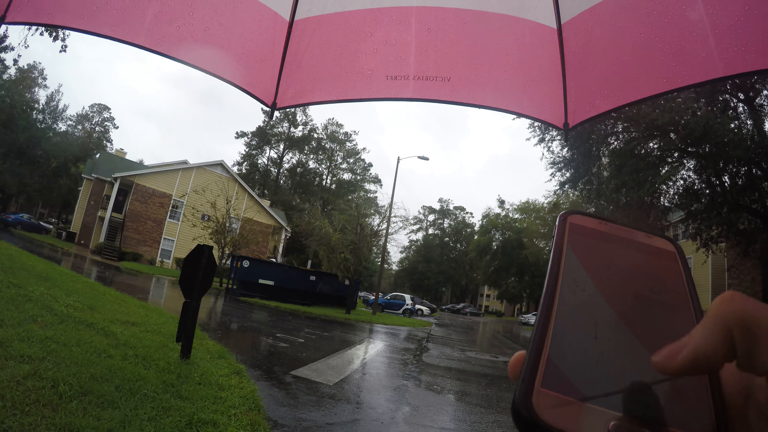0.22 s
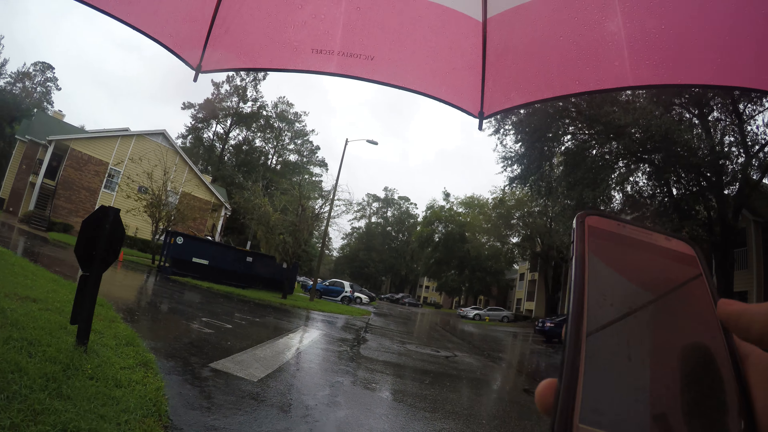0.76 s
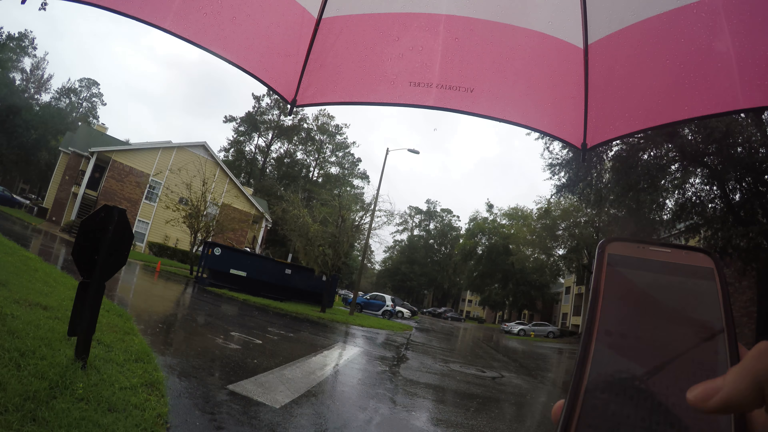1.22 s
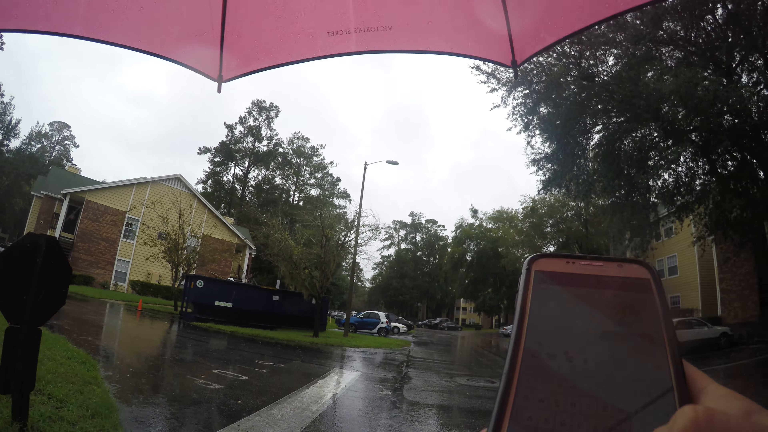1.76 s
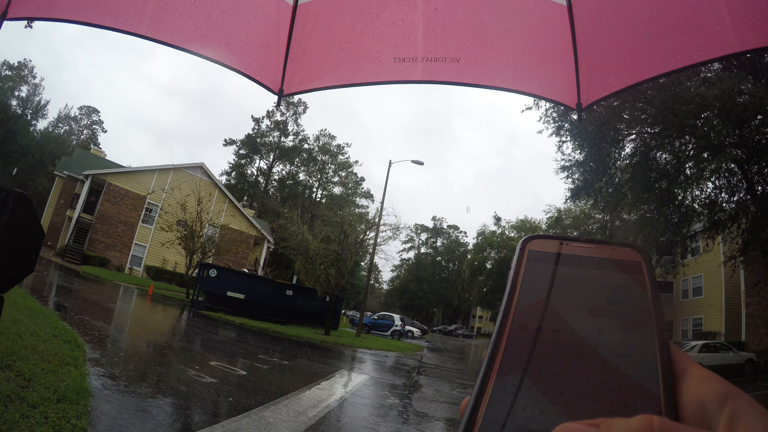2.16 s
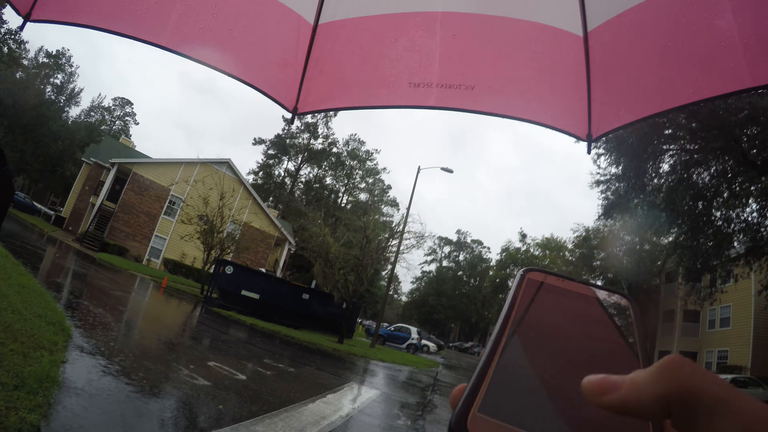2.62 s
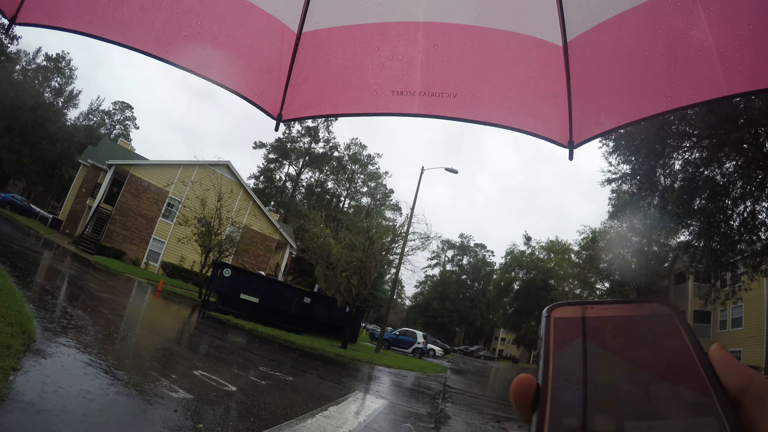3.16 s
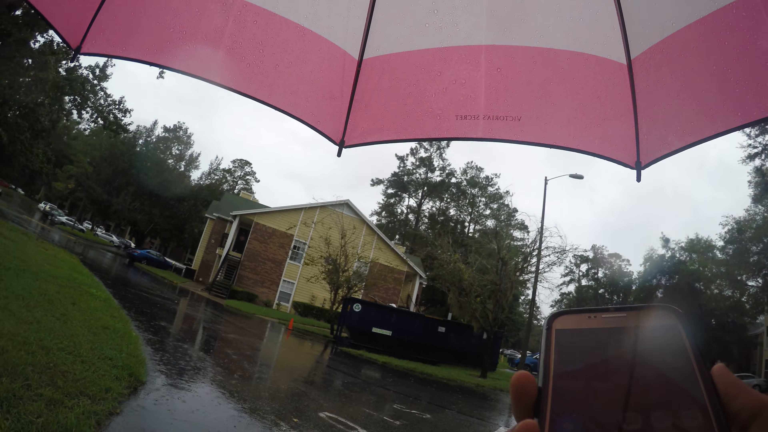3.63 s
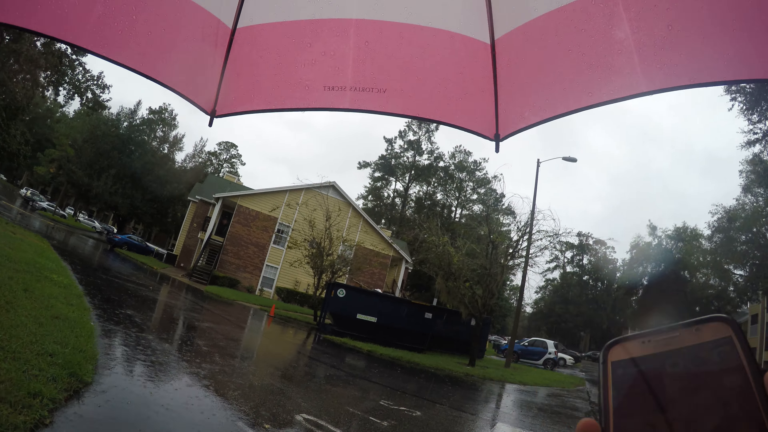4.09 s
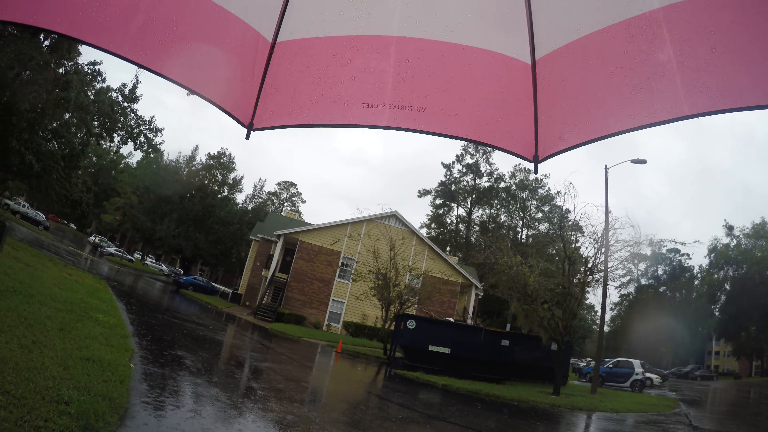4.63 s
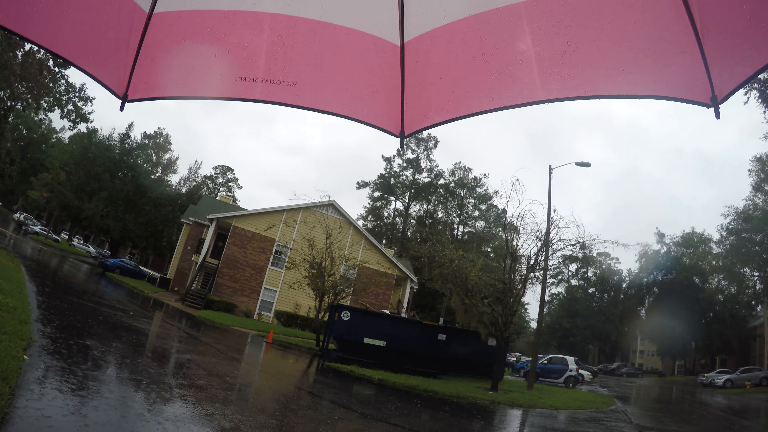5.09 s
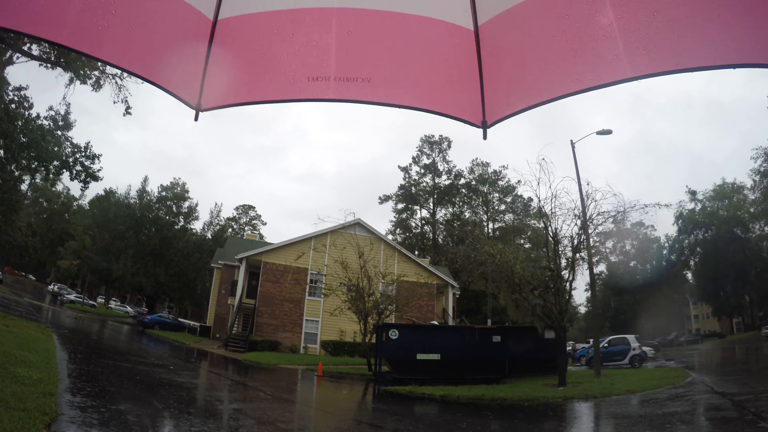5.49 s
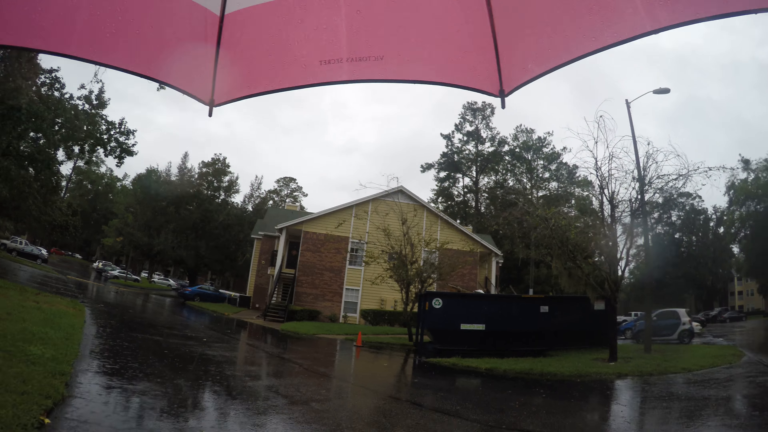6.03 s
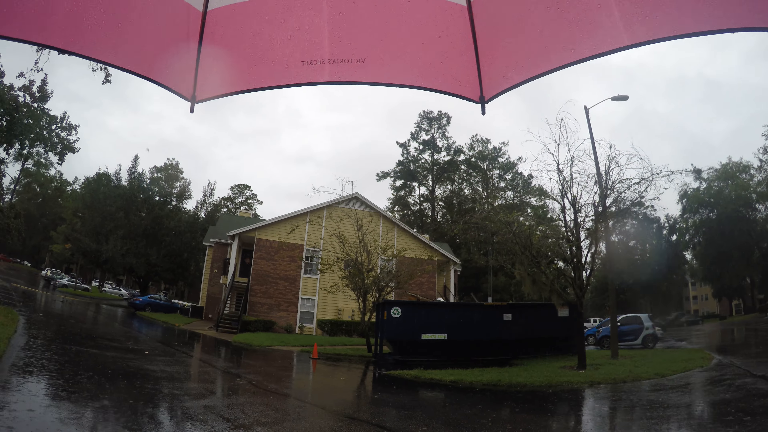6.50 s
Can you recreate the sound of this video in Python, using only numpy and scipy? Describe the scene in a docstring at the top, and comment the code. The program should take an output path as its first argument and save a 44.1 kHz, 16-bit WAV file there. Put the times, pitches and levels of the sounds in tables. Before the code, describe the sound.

For about seven seconds, rain falls on a stretched fabric umbrella right above a handheld camera. Fat drops tick and tap at irregular gaps, dull and slightly papery, over a continuous fine patter that swells and eases; the drops crowd around 2 to 2.5 and 3 to 3.5 seconds. Behind is a quiet, steady hiss of rain on street and trees, low lumpy wind rumble, and a barely audible high electronic whine. Small puddle plips ring near 0.6, 3.9 and 4.8 seconds. Soft hand thumps occur at about 0.4 and 3.3, and at 3.8 with a short rub and faint squeak. Brief touches return near 4.9 and 5.4. From 5.6 to 6.0, fingers scrape plastic with bumps and a tiny squeak; at 6.07 one loud, dry, clipped snap cracks, with small rattles just after. Lighter drops finish the scene.

```python
"""Beneath a fabric umbrella in a wet street: fat drops tick on the taut canopy amid a fine patter.
Each drop is a push, a splash and a flutter coloured by the cloth; puddle drips ring as bubbles.
Fingers rub, squeak and bump on a camera's plastic housing by stick-slip and damped swings; decaying
modes and a burst of noise make one loud, overloading snap with small rattles.
Behind lie wind rumble and street hiss, both shaped noise, and a faint whine of two sine tones."""
import sys
import numpy as np
from scipy import signal
from scipy.fft import rfft, irfft, next_fast_len
from scipy.io import wavfile
from scipy.ndimage import uniform_filter1d, map_coordinates

SR = 44100
rng = np.random.default_rng(int(sys.argv[2]) if len(sys.argv) > 2 else 0)


def materialize(psi):
    """Save the field psi as 16-bit PCM at rate SR to the path in sys.argv[1].

    A 1-D psi becomes a single channel; in a 2-D psi each row is a channel.
    """
    bounded = np.clip(np.atleast_2d(psi).T, -1, 1)
    quanta = np.round(bounded * 32767).astype(np.int16)
    wavfile.write(sys.argv[1], SR, quanta)


N = 298116
TOP_HZ = 15600  # upper band limit of the input


def amp(db):
    """Logarithmic level: decibels to linear gain."""
    return 10 ** (np.asarray(db) / 20)


def unit(x):
    """Power normalisation: scale to rms 1."""
    return x / np.sqrt(np.mean(x ** 2) + 1e-20)


def along(points, hz):
    """Spectral envelope: (Hz, value) points interpolated on a log-frequency axis."""
    f, v = np.transpose(points)
    return np.interp(np.log(hz + 1), np.log(f), v)


def curve(rows):
    """Temporal envelope: (s, value) rows interpolated at every sample."""
    return np.interp(np.arange(N) / SR, *np.transpose(rows))


def wobble(rate):
    """Random modulation: a smooth curve through rate random knots a second."""
    knots = rng.standard_normal(int(N * rate / SR) + 4)
    return map_coordinates(knots, [np.arange(N) * rate / SR])


def filtered(x, response):
    """Linear filtering: the spectrum of x times a response of frequency."""
    m = next_fast_len(N + SR // 2)
    return irfft(rfft(x, m) * response(np.fft.rfftfreq(m, 1 / SR)), m)[:N]


def noise(spectrum):
    """Coloured noise: white noise through a spectral envelope, scaled to rms 1."""
    return unit(filtered(rng.standard_normal(N), lambda hz: amp(along(spectrum, hz))))


def high(hz, edge_hz):
    """High-pass filtering: a smooth gain that reaches one half at the edge."""
    return hz ** 4 / (hz ** 4 + edge_hz ** 4)


def causal(db):
    """Minimum phase: causal responses for rows of dB gains, by folding the cepstrum."""
    cepstrum = irfft(np.log(amp(db)))
    half = cepstrum.shape[1] // 2
    cepstrum[:, 1:half] *= 2
    cepstrum[:, half + 1:] = 0
    return np.exp(rfft(cepstrum))


def placed(times, sounds):
    """Superposition: sum rows of short sounds, each at its own time."""
    starts = np.round(np.abs(times) * SR).astype(int)
    index = starts[:, None] + np.arange(sounds.shape[1])
    return np.bincount(index.ravel(), sounds.ravel(), N)[:N]


# response of the stretched cloth to a drop: pitch_hz [Hz], gain_db [dB]
CLOTH_RESPONSE = [(80, -24.5), (300, -8), (700, -11.5), (950, -4), (1100, 1.5), (1330, -7.5), (1750, -8.5),
                  (2020, -12.5), (2280, -3.5), (2650, -8.5), (3000, -14.5), (3900, -12), (4900, -25),
                  (14000, -43)]


def ticks(times, db, bright_db, spot_db, flutter_db, flutter_t60, size=1024):
    """Impact excitation of a membrane: push, splash and flutter, coloured by the spot that is hit."""
    t, hz = np.arange(size) / SR, np.fft.rfftfreq(size, 1 / SR)

    def grain():
        return rng.standard_normal((len(times), size))

    # the push carries the low notes; the treble comes from the drop bursting just after
    burst = t * np.exp(-t / 0.00073)
    splash = amp(1.5) * rfft(burst / np.linalg.norm(burst) * grain())
    flutter = rfft(amp(flutter_db - 60 * t / flutter_t60) * grain())
    treble = high(hz, edge_hz=4300)
    force = np.sqrt(1 - treble) + np.sqrt(treble) * splash + flutter

    # each spot adds its own random ripple over frequency
    octaves = np.log2(np.clip(hz, 800, 3300) / 1500)
    ripple = uniform_filter1d(rng.standard_normal(force.shape), size=12)
    spot = unit(uniform_filter1d(ripple, size=8))
    cloth = causal(along(CLOTH_RESPONSE, hz) + bright_db[:, None] * octaves + spot_db * spot)

    # dispersion: treble runs through the cloth faster than the low notes
    lag_s = 0.00065 * np.exp(-hz / 2500)
    dispersion = np.exp(-2j * np.pi * np.cumsum(lag_s) * hz[1])
    sounds = irfft(force * cloth * dispersion)
    strength = np.sqrt(np.mean(sounds[:, :SR // 250] ** 2, axis=1))  # rms of the first 4 ms
    return placed(times, sounds * (amp(db) / strength)[:, None])


# fat drops: start_s [s], level_db [dB rms over 4 ms, before the common trim],
# bright_db [dB per octave between 800 and 3300 Hz, added to the cloth's response]
FAT_DROPS = [(0.047, -39, 3.5), (0.0611, -39.5, -1.5), (0.2134, -39, 1), (0.3555, -40.5, 2),
             (0.4711, -37.5, -2), (0.758, -40.5, 0), (1.0338, -44, 1), (1.2514, -37.5, -1.5),
             (1.309, -45, -1), (1.328, -43.5, 7.5), (1.4431, -38, -1), (1.5611, -42.5, -2),
             (1.721, -47, -8), (1.8164, -41.5, 2.5), (1.9642, -41, -7), (2.0204, -39, 1), (2.0533, -43, 5),
             (2.153, -39, -4), (2.2285, -38.5, 1), (2.2798, -41, -1), (2.3881, -34, -4.5), (2.432, -45, 0),
             (2.513, -47, 10), (2.5934, -43, 3.5), (2.9155, -35, -2), (2.957, -41, 3), (2.988, -39.5, -1.5),
             (3.0375, -40, 0.5), (3.1007, -42, 0.5), (3.183, -39.5, -3), (3.298, -35.5, -1.5),
             (3.318, -39, -4), (3.4656, -38.5, -6.5), (3.5139, -41.5, 1), (3.5274, -39.5, -2.5),
             (3.7354, -41.5, -3), (3.8933, -41.5, 2), (3.9141, -39.5, -1), (4.0966, -44.5, 5),
             (4.2574, -44.5, 2), (4.2711, -41, -2), (4.299, -40.5, 1), (4.4306, -40, 3.5),
             (4.5585, -45, -1), (4.602, -40.5, -0.5), (4.839, -38, 11), (4.9, -34, 2.5), (5.0254, -37, 1.5),
             (5.088, -41, 3), (5.4095, -34.5, 2.5), (5.5423, -41.5, 3), (6.037, -42.5, 1.5),
             (6.1772, -45, 0), (6.239, -45, -2), (6.337, -45, -7), (6.3804, -40, -2), (6.476, -40.5, -8),
             (6.5998, -38, -1), (6.705, -43, -7)]


def near_drops():
    """Discrete impacts: fat drops strike the cloth right over the microphone."""
    start_s, level_db, bright_db = np.transpose(FAT_DROPS)
    trim = amp(-0.85)
    return trim * ticks(start_s, level_db, bright_db, spot_db=3.0, flutter_db=-31.0, flutter_t60=0.041)


# swell and ease of the patter: start_s [s], weight_db [dB added to the drops' levels]
SHOWER_WEIGHT = [(0.0, -2), (0.28, -3), (0.65, 1), (1.12, -2), (1.45, 2), (1.8, 0), (2.08, 2.5),
                 (2.38, -2.5), (2.65, -1), (2.85, -3.5), (3.14, 3), (3.55, 0), (4.03, 2.5), (4.62, 0.5),
                 (4.75, -2), (5.3, -1.5), (6.3, -7), (6.6, 1)]


def patter(count, level_db, spread_db, bright_db, scatter_s):
    """Random impact train: drops land at uneven gaps, heavier when the shower swells."""
    slip, weight, tilt = rng.random(count), rng.random(count), rng.standard_normal(count)
    even_s = np.arange(count) / count * N / SR
    when = (even_s + scatter_s * slip) % (N / SR)
    shower_db = np.interp(when, *np.transpose(SHOWER_WEIGHT))
    db = level_db + shower_db - spread_db * np.sqrt(weight)
    return ticks(when, db, bright_db + 1.6 * tilt, spot_db=3.0, flutter_db=-23.5, flutter_t60=0.028)


def canopy():
    """Superposed impact trains: middling drops tick among a fine patter of small ones."""
    middling = patter(count=190, level_db=-42, spread_db=7.0, bright_db=0.0, scatter_s=0.09)
    small = patter(count=820, level_db=-49, spread_db=7, bright_db=1.5, scatter_s=0.06)
    return middling + small


# drips into puddles: start_s [s], level_db [dB before the bubble's swell], pitch_hz [Hz at the start]
PUDDLE_DRIPS = [(0.604, -27, 2640), (0.685, -33, 4500), (1.954, -46, 2700), (3.938, -33, 4300),
                (4.838, -31, 2700)]


def drips():
    """Bubble resonance: trapped air rings for a dozen cycles, rising a little in pitch."""
    start_s, level_db, pitch_hz = np.transpose(PUDDLE_DRIPS)
    t = np.arange(SR // 30) / SR
    cycles = pitch_hz[:, None] * (t + 3 * t ** 2)
    swell = cycles / 7.3 * np.exp(1 - cycles / 3.0)
    return placed(start_s, amp(level_db)[:, None] * swell * np.sin(2 * np.pi * cycles))


# the snap and its rattles: start_s [s], level_db [dB, relative], hardness [0-1]
SNAP_CONTACTS = [(6.0733, 2, 0.98), (6.0842, -21.5, .7), (6.0888, -29.5, 0.6), (6.096, -31.5, 0.74)]
# modes of the housing: pitch_hz [Hz], level_db [dB, relative], t60_s [s at hardness 1]
HOUSING_MODES = [(1494, -27, 0.07), (1635, -22.5, 0.043), (1760, -21.5, 0.068), (2110, -22.5, 0.13),
                 (2240, -5, 0.03), (2387, -10, 0.029), (2520, -7.5, 0.015), (2920, -7, 0.016),
                 (3160, -15, 0.017), (3400, -6.5, 0.015), (3783, -4.5, 0.0098), (5240, -8, 0.0074),
                 (5595, -4, 0.0086), (8050, -15, 0.0073)]
# colour of the struck or rubbed housing: pitch_hz [Hz], gain_db [dB]
HOUSING_COLOUR = [(200, -16.5), (700, -22), (1350, -8), (1850, 0.5), (2700, 3.5), (3150, -10),
                  (4200, -12.5), (4700, -6.5), (5150, -14.5), (5700, -9.5), (6500, -15), (7700, -24),
                  (9300, -24), (15000, -33)]


def clicks():
    """Modal ringing: the housing snaps and rattles; softer contacts crack less and ring shorter."""
    start_s, level_db, hard = np.transpose(SNAP_CONTACTS)
    t = np.arange(SR // 6) / SR
    hard = np.clip(hard, 0.05, 1)[:, None]
    age = t / hard
    modes = np.zeros(age.shape)
    for k, (pitch_hz, mode_db, t60_s) in enumerate(HOUSING_MODES):
        sign = (-1) ** k  # neighbouring modes start in opposite directions
        modes += sign * amp(mode_db - 60 * age / t60_s) * np.sin(2 * np.pi * pitch_hz * t)
    # one sharp blow, then a few milliseconds of chatter
    blow = amp(20.5) * (t == 0)
    chatter = amp(9.5 - 60 * age / 0.008) * rng.standard_normal(age.shape)
    crack = hard ** 4 * (blow + chatter)
    hz = np.fft.rfftfreq(1024, 1 / SR)
    plastic_db = along(HOUSING_COLOUR, hz)[None] - 3 * high(hz, edge_hz=17000)
    plastic = irfft(causal(plastic_db))[0]
    size = amp(level_db)[:, None]
    ringing = placed(start_s, size * modes)
    return ringing + signal.fftconvolve(placed(start_s, size * crack), plastic)[:N]


# soft bumps of the hand: start_s [s], level_db [dB before the swing and knock gains], pitch_hz [Hz]
HAND_BUMPS = [(0.368, -32.5, 119), (0.462, -25, 166), (2.915, -36.5, 110), (3.319, -24.5, 48),
              (3.801, -20, 82), (4.893, -32, 126), (5.111, -27.5, 228), (5.116, -23, 43), (5.413, -27, 66),
              (5.622, -27.5, 53.3), (5.731, -21, 45), (5.809, -23, 50.4)]


def bumps():
    """Heavily damped oscillation: a bump gives one or two swings and a short hollow knock."""
    start_s, level_db, pitch_hz = np.transpose(HAND_BUMPS)
    t = np.arange(SR // 8) / SR
    cycles = pitch_hz[:, None] * t
    swing = -np.sin(2 * np.pi * cycles) * amp(3.0 - 13.7 * cycles)
    # quicker bumps knock harder
    hollow = np.sin(2 * np.pi * 340 * t) + 0.34 * np.sin(2 * np.pi * 600 * t)
    knock = pitch_hz[:, None] / 170 * amp(-2 - 60 * t / 0.011) * hollow
    return placed(start_s, amp(level_db)[:, None] * (swing + knock))


# strokes of a finger on the housing: start_s [s], length_s [s], level_db [dB, peak of the pressure]
FINGER_STROKES = [(3.792, .07, -38), (4.892, 0.045, -32.5), (4.942, 0.016, -38.5), (5.407, 0.022, -39.5),
                  (5.439, 0.052, -40), (5.579, 0.062, -40.5), (5.618, 0.048, -34), (5.653, 0.086, -36),
                  (5.72, 0.091, -27), (5.774, 0.066, -33), (5.837, 0.062, -35), (5.86, 0.077, -29.5),
                  (5.915, 0.079, -31.5), (5.969, 0.05, -42)]
STROKE_SKEW, STROKE_TAPER = 0.66, 0.99  # skew under 1 swells faster than it fades; taper sets how steep both ends are (near 1 it leaves the sine arch almost unchanged)


def pressure():
    """Contact force envelope: each stroke is one leaning arch; overlapping arches add as power."""
    t, power = np.arange(N) / SR, np.zeros(N)
    for start_s, length_s, level_db in FINGER_STROKES:
        progress = np.clip((t - start_s) / length_s, 0, 1)
        arch = np.abs(np.sin(np.pi * progress ** STROKE_SKEW)) ** STROKE_TAPER
        power += (amp(level_db) * arch) ** 2
    return np.sqrt(power)


def rubbing():
    """Stick-slip friction: skin scrapes plastic; a harder stroke is louder, brighter and shakes the body."""
    press = pressure()
    slips = unit(rng.standard_normal(N) * amp(1.3 * wobble(700) + 1.6 * wobble(110)))
    scrape = unit(filtered(slips, lambda hz: amp(along(HOUSING_COLOUR, hz))))
    edge = filtered(scrape, lambda hz: high(hz, edge_hz=3450))
    force = np.clip((press / amp(-26.5)) ** 0.87, 0, 2)  # treble gain, 1 at a pressure of -26.5 dB
    shake = amp(-18) * noise([(60, -22), (130, 3.5), (280, -2.5), (600, -17.5), (1500, -40)])
    return press * (scrape + (force - 1) * edge + shake)


# skin squeaks: start_s [s, centre of the squeak], half_s [s, from the centre to 1/e],
# level_db [dB of the fundamental before its flicker], pitch_hz [Hz, mean]
SKIN_SQUEAKS = [(3.832, 0.018, -37, 1974), (5.7495, 0.0006, -25.5, 9400)]


def squeaks():
    """Periodic stick-slip: skin on plastic sounds a few harmonics of a rough, unsteady pitch."""
    t, waver, out = np.arange(N) / SR, wobble(1100), np.zeros(N)
    for start_s, half_s, level_db, pitch_hz in SKIN_SQUEAKS:
        phase = 2 * np.pi * np.cumsum(pitch_hz * (1 + 0.06 * waver)) / SR
        tone = sum(np.sin(k * phase) / k ** 1.7 for k in range(1, 4) if k * pitch_hz < TOP_HZ)
        swell = np.exp(-((t - start_s) / half_s) ** 2)
        out += amp(level_db + 3.5 * wobble(300)) * swell * tone
    return out


# gusts at the microphone: start_s [s], level_db [dB, before the eddies' offsets and swings]
GUSTS = [(0.0, -29), (0.11, -44.5), (0.27, -38), (0.31, -47.5), (0.42, -35.5), (0.76, -42), (0.97, -30.5),
         (1.12, -43), (1.49, -45), (1.54, -35.5), (1.87, -46), (2.13, -37.5), (2.51, -51.5), (2.65, -46),
         (2.68, -37.5), (3.15, -43), (3.47, -33.5), (3.55, -50), (3.92, -35.5), (4.15, -46.5), (4.51, -36),
         (4.57, -45), (5.16, -35.5), (5.26, -42.5), (5.82, -32), (5.92, -40), (6.08, -35.5), (6.28, -53),
         (6.31, -45), (6.75, -40.5)]
# colour of the wind rumble: pitch_hz [Hz], level_db [dB per Hz, relative]
WIND_COLOUR = [(8, -7), (20, 1.5), (30, 2.5), (55, -7), (100, -16), (200, -22.5), (330, -30.5), (550, -45),
               (1500, -66.5)]
# big eddies: level over the gusts (dB), swing (dB), lumps per second
BIG_DB, BIG_SWING_DB, BIG_PER_S = 1.5, 1.5, 12
# small eddies: level (dB), growth (dB per dB of gust), swing (dB), lumps per second
SMALL_DB, SMALL_GROWS, SMALL_SWING_DB, SMALL_PER_S = -39, 0.38, 2.5, 35


def wind():
    """Turbulence noise: eddies buffet the microphone in lumps; the small, higher ones vary faster."""
    air = noise(WIND_COLOUR)
    small = filtered(air, lambda hz: high(hz, edge_hz=56))
    big = air - small
    gust_db = curve(GUSTS)
    big_db = gust_db + BIG_DB + BIG_SWING_DB * wobble(BIG_PER_S)
    growth_db = SMALL_GROWS * (gust_db - gust_db.mean())
    small_db = SMALL_DB + growth_db + SMALL_SWING_DB * wobble(SMALL_PER_S)
    return amp(big_db) * big + amp(small_db) * small


# colour of rain on the street and trees: pitch_hz [Hz], level_db [dB per Hz, relative]
STREET_COLOUR = [(150, -1), (300, -5.5), (600, -12.5), (1080, -3.5), (1400, -13.5), (1750, -4.5),
                 (2020, -10.5), (2300, -4), (3020, -10), (3860, -12), (4930, -15), (8000, -22.5),
                 (15000, -29)]


def street():
    """Incoherent summation: countless far drops merge into a gently shifting hiss."""
    level_db = -59.0 + 0.27 * wobble(1.7) + 1.2 * wobble(25)
    return amp(level_db) * noise(STREET_COLOUR)


# faint whine of the electronics: pitch_hz [Hz], level_db [dB rms]
WHINE_TONES = [(7348, -88), (14696, -87)]


def whine():
    """Pure tones: the electronics sound as steady sines, root two turning rms into peak."""
    t = np.arange(N) / SR
    return sum(amp(db) * np.sqrt(2) * np.sin(2 * np.pi * hz * t) for hz, db in WHINE_TONES)


def scene():
    """Linear superposition: umbrella, hand, wind, street and whine add at one microphone."""
    rain = near_drops() + canopy() + drips() + street()
    hand = clicks() + bumps() + rubbing() + squeaks()
    return (rain + hand + wind() + whine())[None]


def record(dry):
    """Overload and band limiting: the input clips at full scale, then loses all above its limit."""
    clipped = np.clip(dry[0], -1, 1)
    return filtered(clipped, lambda hz: 1 / (1 + (hz / TOP_HZ) ** 120))[None]


dry = scene()
out = record(dry)
materialize(out)
```